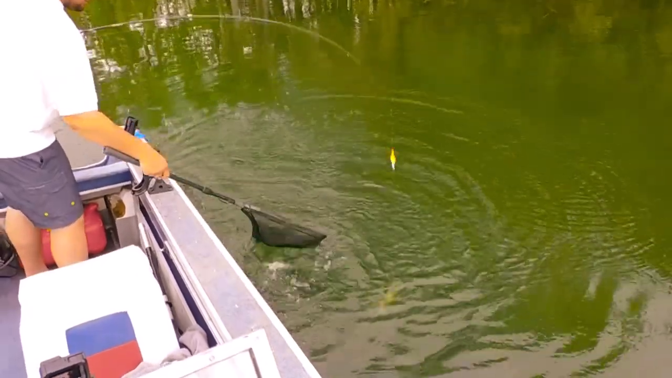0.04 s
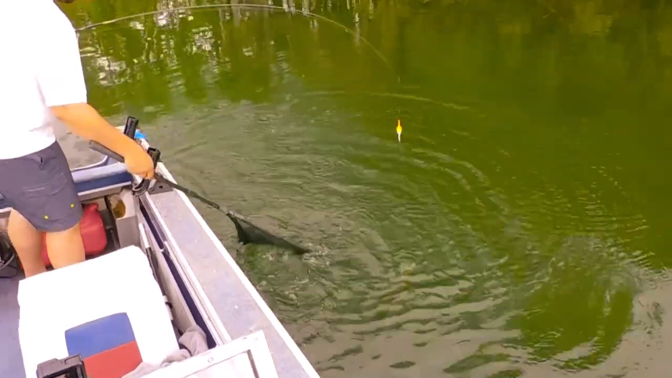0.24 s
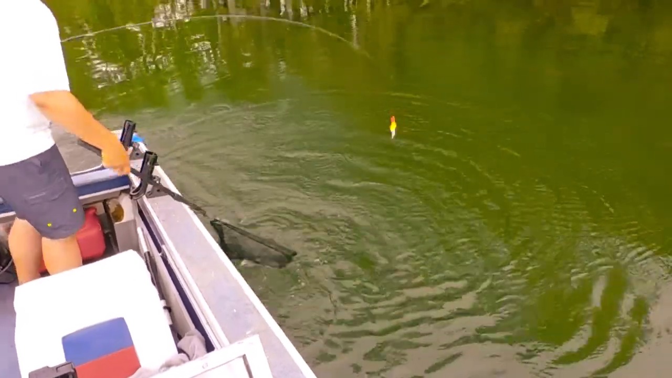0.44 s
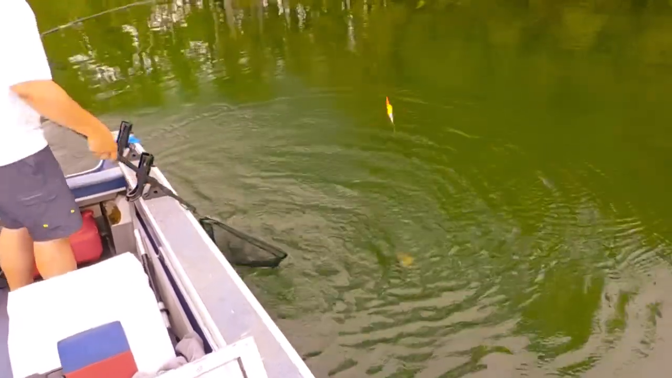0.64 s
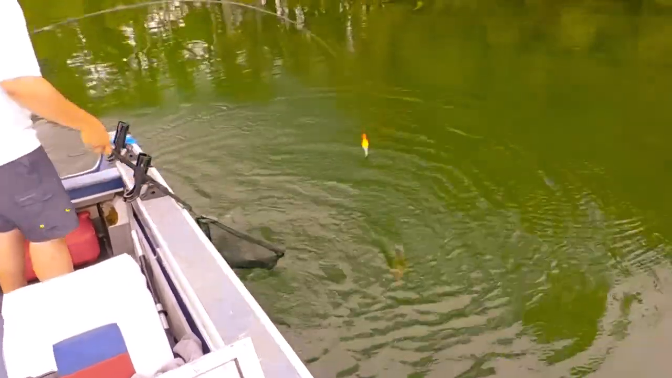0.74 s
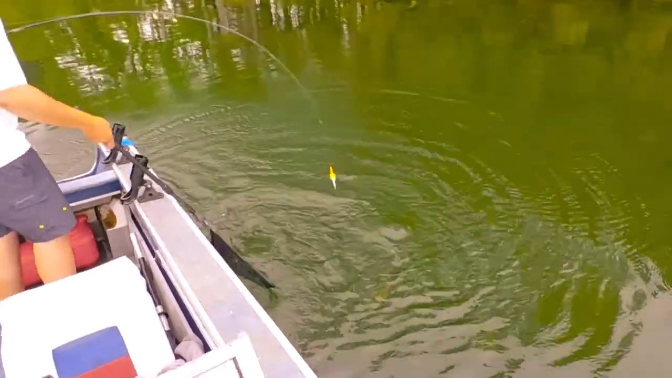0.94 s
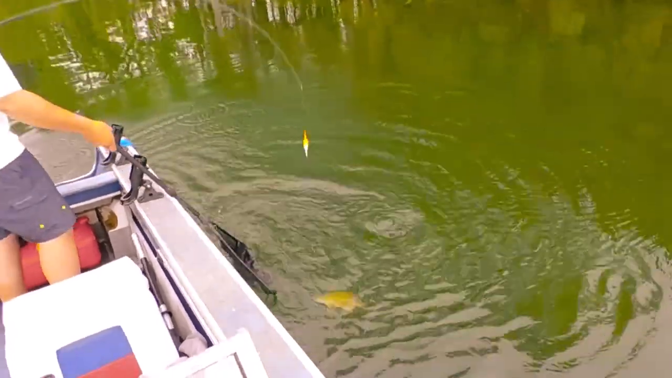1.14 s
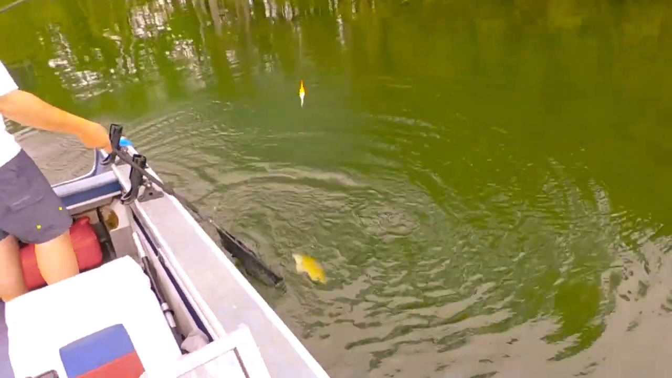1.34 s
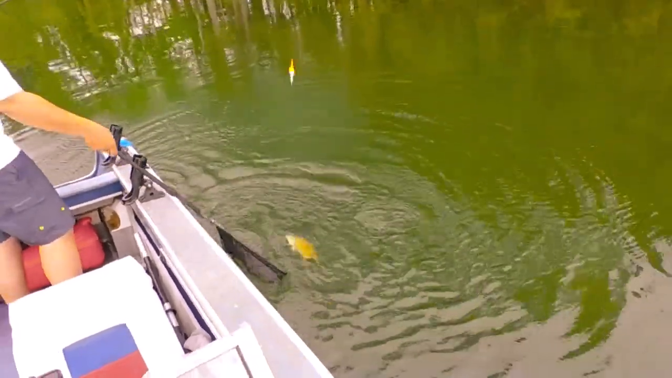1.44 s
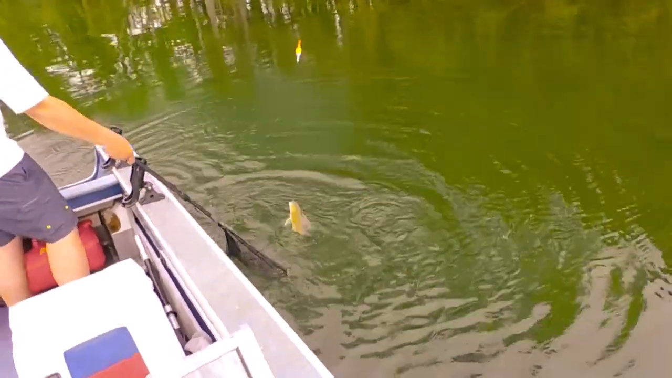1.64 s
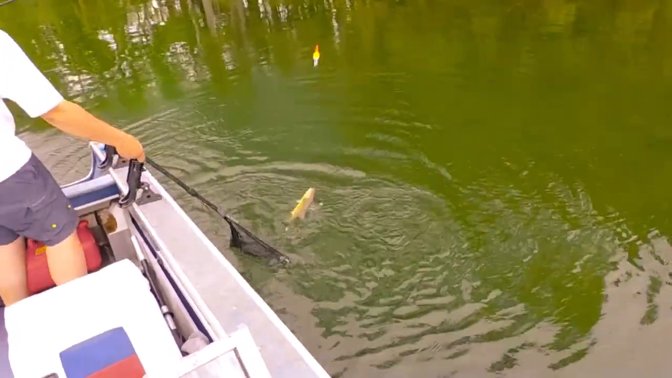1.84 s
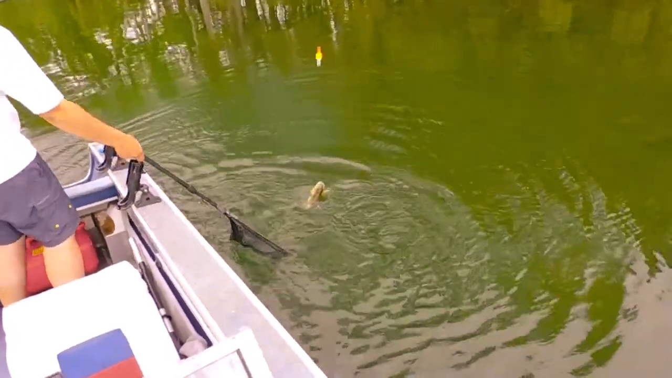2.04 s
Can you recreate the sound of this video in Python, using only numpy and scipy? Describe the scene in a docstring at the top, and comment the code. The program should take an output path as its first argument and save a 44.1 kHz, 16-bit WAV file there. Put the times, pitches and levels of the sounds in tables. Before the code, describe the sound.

Water laps and bubbles beside a small boat as a net knocks against the hull.

```python
"""Netting a fish beside a small boat

On a calm lake a landing net rattles against a boat, and a few knocks make the hull ring.
A hooked fish stirs the water, which laps and plips as each bubble rings with a short rising tone.
Under it lie a low rumble of wind, the faint hum of an electric motor and distant birds."""
import sys
import numpy as np
from scipy import signal
from scipy.fft import rfft, irfft, next_fast_len
from scipy.io import wavfile
from scipy.ndimage import map_coordinates

SR = 44100
rng = np.random.default_rng(int(sys.argv[2]) if len(sys.argv) > 2 else 0)


def materialize(psi):
    """Save the field psi as 16-bit PCM at rate SR to the path in sys.argv[1].

    A 1-D psi becomes a single channel; in a 2-D psi each row is a channel.
    """
    bounded = np.clip(np.atleast_2d(psi).T, -1, 1)
    quanta = np.round(bounded * 32767).astype(np.int16)
    wavfile.write(sys.argv[1], SR, quanta)


N = 92610

# The tone colours of the noises. Each row: frequency in Hz, relative level in dB.
AIR_COLOUR = [(12, -32), (25, -4.5), (65, -5), (168, -9), (434, -9), (620, -6), (780, -9), (1000, -10.5),
              (1710, -21), (3300, -29.5), (4600, -31.5), (7110, -30), (14700, -30), (16000, -35)]
WIND_COLOUR = [(10, -3.5), (25, -5), (42, 0), (58, -7.5), (75, -2.5), (100, -26), (300, -23.5), (2000, -84)]
TWITTER_COLOUR = [(1500, -54), (3000, -9), (4000, -0.5), (5000, -2.5), (6000, -13.5), (9000, -53)]
WASH_COLOUR = [(60, -73), (300, -13.5), (600, -6), (1000, -2.5), (1600, -7), (2600, -12.5), (3800, -24.5),
               (7000, -33), (16000, -46)]
SLOSH_COLOUR = [(60, -28), (150, -2), (330, 2), (700, -1), (1200, -11), (4000, -47), (16000, -68)]
TINK_COLOUR = [(3000, -50), (5200, -23), (5800, 12.5), (6150, 10), (6550, 2), (7200, -7), (8000, -1),
               (9500, -13), (16000, -21)]
PANEL_COLOUR = [(30, -24), (120, -11), (250, 0.5), (600, -5), (1500, -13), (2800, -7), (4500, -22),
                (8000, -26), (16000, -50)]
# How alike a noise is in both ears. Each row: frequency in Hz, likeness (1 means the same).
EAR_LIKENESS = [(30, .94), (150, 0.67), (500, 0.61), (2000, 0.52), (5000, 0.22), (9000, 0.1), (14000, 0.13)]
# How hard the wind blows and the water is stirred. Each row: time in seconds, level in dB.
WIND_LEVELS = [(0, -66.5), (.35, -64.5), (.55, -61), (.95, -63.5), (1.15, -68.5), (2.1, -65)]
STIR_LEVELS = [(0, -59.5), (.18, -58.5), (.33, -59.5), (.55, -61.5), (.8, -61), (1.05, -64.5), (1.28, -64),
               (1.48, -62.5), (1.58, -63), (1.72, -57.5), (1.85, -62), (2.1, -62.5)]
# The tones of the motor. Each row: multiple of the shaft speed, level in dB.
MOTOR_TONES = [(1, -69.5), (5, -82), (9, -78.5), (10, -77.5), (11, -72), (12, -78.5), (13, -82), (15, -84),
               (16, -81)]
# A songbird's notes. Each row: start and length in seconds, first and last pitch in Hz.
BIRD_NOTES = [(0.43, 0.034, 4600, 5270), (0.499, .04, 4300, 5150), (0.59, .04, 4700, 5020),
              (0.656, 0.016, 4880, 5240), (0.759, 0.056, 4960, 4530), (0.834, .05, 4790, 5100),
              (0.903, .04, 4000, 4360), (1.001, 0.042, 4780, 5100), (1.136, 0.031, 4000, 4760),
              (1.212, 0.053, 6140, 4750), (1.318, 0.037, 4320, 3600), (1.353, 0.038, 4030, 4850),
              (1.47, 0.069, 4030, 4610), (1.614, .05, 5800, 4230), (1.645, 0.051, 4420, 3760),
              (1.698, 0.045, 3850, 3480)]
# Closing air pockets. Each row: start and length in seconds, level in dB, first and last pitch in Hz.
AIR_POCKETS = [(.155, .04, -57, 1300, 1650), (.26, .055, -59, 780, 1200), (.755, .06, -57.5, 760, 2100),
               (.96, .028, -56, 1150, 1850)]
# Single bubbles. Each row: start in seconds, level in dB, pitch in Hz, fade time in seconds,
# rise in octaves per second. A fade time (t60) is how long a sound takes to drop by 60 dB.
SINGLE_BUBBLES = [(.096, -51, 1850, 0.028, 2.3), (0.173, -51.5, 1656, 0.037, 4), (.297, -51, 1030, 0.04, 7),
                  (0.995, -48.5, 877, 0.13, 5.6), (1.188, -56.5, 1716, 0.058, 1.5),
                  (1.458, -52, 880, 0.025, 3.4), (1.667, -50, 967, 0.035, 3.4),
                  (1.695, -46.5, 1597, 0.035, 14), (1.74, -59, 2630, 0.086, 5.6),
                  (1.741, -50.5, 1850, .025, 15), (1.768, -54, 2860, 0.014, 3.5),
                  (1.787, -54.5, 2230, 0.021, 4), (1.798, -48.5, 960, 0.034, 1.8),
                  (1.874, -56, 1570, 0.049, 2.8), (1.8829, -38, 1048, 0.017, 2),
                  (1.89, -48.5, 1000, 0.051, 10.2), (1.908, -50, 2340, 0.018, 4),
                  (1.919, -48.5, 2210, 0.04, 3.2)]
# Clacks of the net's handle and tackle. Each row: start in seconds, level in dB, centre in Hz,
# width in octaves, fade time in seconds.
NET_CLACKS = [(0.2138, -49.5, 2600, 0.34, .015), (.2152, -51, 4860, 0.42, 0.029),
              (0.216, -40, 1170, 0.94, 0.021), (.218, -41, 680, 0.59, 0.027),
              (0.228, -48, 2400, 0.45, 0.042), (0.2321, -38, 1070, 0.48, 0.013),
              (0.237, -45.5, 1670, 2.6, 0.015), (0.242, -54, 2600, 0.39, 0.022),
              (.365, -39.5, 2600, 0.5, 0.016), (.366, -34.5, 792, 0.14, 0.042),
              (0.414, -56, 3700, .3, 0.005), (.4148, -37.5, 2460, 0.53, 0.0053),
              (0.426, -51, 2900, 0.22, 0.013), (.587, -50, 1986, 0.091, .02),
              (0.7107, -42, 2130, 0.79, 0.0076), (0.7182, -57.5, 2580, 0.62, 0.063),
              (0.833, -61, 2380, 0.7, 0.028), (.859, -54.5, 1480, 0.85, .012),
              (1.15, -55.5, 2430, 0.42, 0.014), (1.483, -60, 900, 1.3, 0.076)]
# The tones the hull rings with. Each row: pitch in Hz, relative level in dB, fade time in seconds.
HULL_TONES = [(58.3, -3.5, 0.27), (73, -9, 0.24), (132.7, 0.5, 0.22), (166.2, -1.5, 0.17), (177, 2.5, 0.11),
              (227, -10, 0.22), (287, -13, 0.186), (439.5, -5, 0.12), (558, -20.5, 0.53), (755, -7, 0.017),
              (880, -25, 0.08), (902, -10, .1), (1140, -5, 0.021), (1307, -5.5, 0.028), (1790, -7, 0.036),
              (2460, -13.5, 0.1), (2464, -19, 0.086)]
# Knocks on the hull. Each row: start in seconds, level in dB, lowest and highest strong pitch in Hz.
HULL_KNOCKS = [(.3645, -33, 45, 2620), (.586, -39.5, 128, 696), (.636, -42, 256, 603),
               (.685, -51, 150, 257), (0.863, -44.5, 120, 496), (0.939, -58, 130, 400)]

TIME = np.arange(N) / SR
LEAD = 64  # samples of room ahead of a noise burst


def amp(db):
    """Turn decibels into a gain to multiply by."""
    return 10 ** (np.asarray(db) / 20)


def unit(x):
    """Scale a sound to an average strength (rms) of 1."""
    return x / np.sqrt(np.mean(x ** 2) + 1e-20)


def along(points, hz):
    """Read between the rows of a frequency table, on a scale of octaves."""
    freqs, values = np.transpose(points)
    return np.interp(np.log(hz + 1), np.log(freqs + 1), values)


def wobble(rate):
    """A smooth curve through `rate` random values a second."""
    return map_coordinates(rng.standard_normal(512), [TIME * rate], mode="wrap")


def hump(hz, centre, octaves):
    """A bell-shaped gain around a centre frequency."""
    return np.exp(-.5 * (np.log2((hz + 1) / centre) / octaves) ** 2)


def filtered(x, gain):
    """Turn each frequency of a sound up or down by gain(Hz)."""
    n = x.shape[-1]
    padded = next_fast_len(n + 8192)
    return irfft(rfft(x, padded) * gain(np.fft.rfftfreq(padded, 1 / SR)), padded)[..., :n]


def noise(gain, size):
    """Steady noise of strength 1, coloured by gain(Hz)."""
    hz = np.fft.rfftfreq(size, 1 / SR)
    return unit(irfft(gain(hz) * np.exp(2j * np.pi * rng.random(len(hz))), size))


def burst(gain, fade):
    """Dying noise coloured by gain(Hz), as strong as its fade."""
    x = filtered(np.pad(rng.standard_normal(len(fade)) * fade, (LEAD, 0)), gain)
    return x * np.linalg.norm(fade) / np.linalg.norm(x)


def rush(colour):
    """Stereo noise of strength 1, centred in the bass and wide in the treble."""
    def gains(hz):
        spread = np.arccos(np.clip(along(EAR_LIKENESS, hz), -1, 1)) / 2
        return amp(along(colour, hz)) * [np.cos(spread), np.sin(spread)]
    mid, side = filtered(rng.standard_normal((2, N)), gains)
    return unit(np.array([mid + side, mid - side]))


def glide(hz):
    """A pure tone that follows a changing pitch."""
    return np.sin(2 * np.pi * np.cumsum(hz) / SR)


def echo(x, t60):
    """Smear a sound into a fading tail, different for each ear."""
    t = np.arange(SR // 4) / SR
    tail = rng.standard_normal((2, len(t))) * amp(-60 * t / t60) * (1 - np.exp(-t / 0.0049))
    return signal.fftconvolve(x[None], tail / np.linalg.norm(tail[0]), axes=1)[:, :N]


def add(track, start, sound):
    """Mix a sound into a track at `start` seconds."""
    part = track[max(round(start * SR), 0):][:len(sound)]
    part += sound[:len(part)]


def place(x, right_db):
    """Move a sound to the right: that side goes up by right_db, the left goes down."""
    return x * amp([[-right_db], [right_db]])


def wind():
    """Wind rumbles in uneven gusts over the steady hush of open air."""
    gusts = amp(np.interp(TIME, *np.transpose(WIND_LEVELS)) + wobble(14))
    return gusts * rush(WIND_COLOUR) + amp(-64.5) * rush(AIR_COLOUR)


def motor(shaft_hz=57.87, waver=0.005165):
    """A small electric motor hums on multiples of its slightly unsteady shaft speed."""
    phase = 2 * np.pi * np.cumsum(shaft_hz * (1 + waver * wobble(4))) / SR
    return np.sqrt(2) * sum(amp(db + 2.2 * wobble(6.04)) * np.sin(k * phase + 2 * np.pi * rng.random())
                            for k, db in MOTOR_TONES)


def songbird(roughness=0.081, dull_above_hz=4750):
    """Short sliding notes, smeared on their way across the lake; higher ones arrive weaker."""
    song = np.zeros(N)
    for start, length, first_hz, last_hz in BIRD_NOTES:
        progress = np.linspace(0, 1, round(length * SR))
        hz = first_hz + (last_hz - first_hz) * progress
        hz *= 1 + roughness * wobble(450)[:len(hz)]
        swell = np.sin(np.pi * progress)
        add(song, start, swell * glide(hz) / (1 + (hz / dull_above_hz) ** 4))
    return amp(-65.5) * echo(song, t60=0.19)


def twitter(end_s=1.715, fade_s=0.21):
    """Birds still further off blur into a faint flickering hiss, which dies away."""
    fade = np.clip((end_s - TIME) / fade_s, 0, 1)
    return fade * amp(-79 + 1.2 * wobble(14.8)) * rush(TWITTER_COLOUR)


def wash(stir):
    """Stirred water makes a soft, flickering rush."""
    return amp(-6 + 1.5 * wobble(20.96)) * stir * rush(WASH_COLOUR)


def slosh(peak_s=1.577, spread_s=0.21):
    """Water heaves once against the hull in a low swell of noise."""
    swell = np.exp(-.5 * ((TIME - peak_s) / spread_s) ** 2)
    return amp(-65.5 + 1.5 * wobble(11.3)) * swell * rush(SLOSH_COLOUR)


def bubble(hz, t60, rise, build_cycles=.8):
    """A dying tone that rises as the bubble nears the surface, with a little splatter."""
    t = np.arange(SR // 10) / SR
    tone = glide(hz * 2 ** (rise * t))
    splatter = amp(-11) * noise(lambda f: hump(f, hz, octaves=.55), len(t))
    return (tone + splatter) * amp(-60 * t / t60) * (1 - np.exp(-t * hz / build_cycles))


def lapping(stir, per_second=150, middle_hz=1279, spread_octaves=0.794, ring_cycles=64):
    """A crowd of small bubbles, louder when the water is stirred harder."""
    out = np.zeros(N)
    for _ in range(int(per_second * N / SR)):
        start = rng.random() * N / SR
        hz = middle_hz * 2 ** (spread_octaves * rng.normal())
        strength = amp(10 * min(rng.exponential(), 2)) * min(1, middle_hz / hz)
        add(out, start, strength * bubble(hz, t60=min(ring_cycles / hz, .08), rise=8))
    return amp(-9.5) * stir * unit(out)


def gurgles():
    """As a pocket of air closes, its soft tone sweeps upward ever faster."""
    out = np.zeros(N)
    for start, length, db, first_hz, last_hz in AIR_POCKETS:
        progress = np.linspace(0, 1, round(length * SR))
        hz = first_hz * (last_hz / first_hz) ** (progress ** 2)
        add(out, start, amp(db) * np.sin(np.pi * progress) * glide(hz))
    return out


def plips():
    """Single bubbles ring out clearly around the fish and the net."""
    out = np.zeros(N)
    for start, db, hz, t60, rise in SINGLE_BUBBLES:
        add(out, start, amp(db) * bubble(hz, t60, rise))
    return out


def tackle(dull_above_hz=5000, tink_s=.366):
    """Net and tackle clack drily; in the hardest knock, metal meets metal with a bright tink."""
    out, t = np.zeros(N), np.arange(SR // 10) / SR
    dull = lambda f: 1 / np.sqrt(1 + (f / dull_above_hz) ** 20) + amp(-12)
    for start, db, hz, octaves, t60 in NET_CLACKS:
        colour = lambda f: (hump(f, hz, octaves) + amp(-32) * hump(f, hz, octaves=3.6)) * dull(f)
        add(out, start - LEAD / SR, burst(colour, amp(db - 60 * t / t60)))
    fade = amp(-60 * t / 0.0059) + amp(-16.5 - 60 * t / 0.033)  # a sharp tick, then a softer ring
    tink = burst(lambda f: amp(along(TINK_COLOUR, f)), amp(-35.5) * fade)
    add(out, tink_s - LEAD / SR, tink)
    return out


def hull(build_cycles=0.71, panel_t60=0.23, drone_hz=164, drone_t60=0.57):
    """Knocks ring the hull and shake its panels; softer ones wake fewer tones. A low drone lingers."""
    out, t = np.zeros(N), np.arange(SR // 2) / SR
    for start, db, low_hz, high_hz in HULL_KNOCKS:
        reach = lambda f: 1 / np.sqrt((1 + (low_hz / (f + 1)) ** 4) * (1 + (f / high_hz) ** 4))
        ring = np.zeros(len(t))
        for k, (hz, tone_db, t60) in enumerate(HULL_TONES):
            tone = (-1) ** k * np.sin(2 * np.pi * hz * t + 0.62 * rng.normal())  # every other one flips
            build = 1 - np.exp(-t * hz / build_cycles)
            ring += reach(hz) * build * amp(tone_db - 60 * t / t60) * tone
        panels = noise(lambda f: amp(along(PANEL_COLOUR, f)), len(t))
        shudder = filtered(panels * amp(-8.5 - 60 * t / panel_t60), reach)
        drone = noise(lambda f: hump(f, drone_hz, octaves=0.72), len(t))
        drone *= amp(-15.5 - 60 * t / drone_t60)
        add(out, start, amp(db) * (ring + shudder + drone))
    return out


def reflections(x, bright_above_hz=2900):
    """Treble bounces around inside the boat; the nearest surfaces make the two sides differ."""
    bright = filtered(x, lambda hz: hz / (hz + bright_above_hz))
    side = amp(-12) * echo(bright, t60=0.005)[0]
    return amp(-8) * echo(bright, t60=0.12) + np.array([side, -side])


def scene():
    """Boat and water close by, over wind, motor and birds."""
    stir = amp(np.interp(TIME, *np.transpose(STIR_LEVELS)))
    lake = wash(stir) + slosh()
    background = wind() + place(motor(), right_db=2) + songbird() + twitter()
    boat = hull() + tackle()
    bubbles = plips() + gurgles() + lapping(stir)
    close_by = place(boat, right_db=0.4) + place(bubbles, right_db=1)
    return background + lake + close_by + reflections(boat + bubbles)


def record(dry, top_hz=15800):
    """Cut away the very highest treble."""
    return filtered(dry, lambda hz: hz < top_hz)


dry = scene()
out = record(dry)
materialize(out)
```